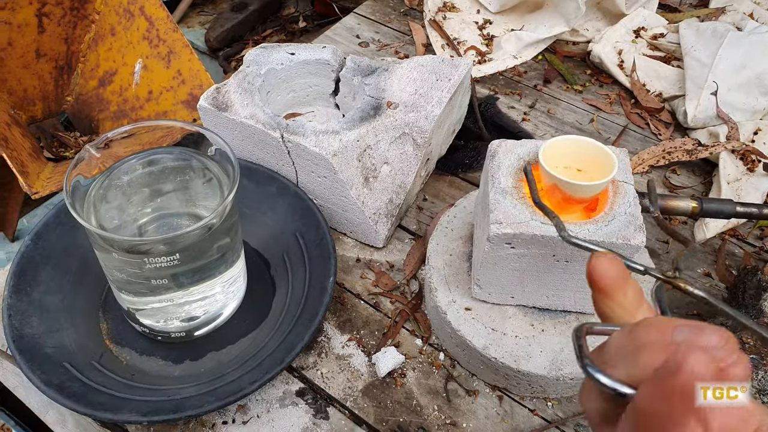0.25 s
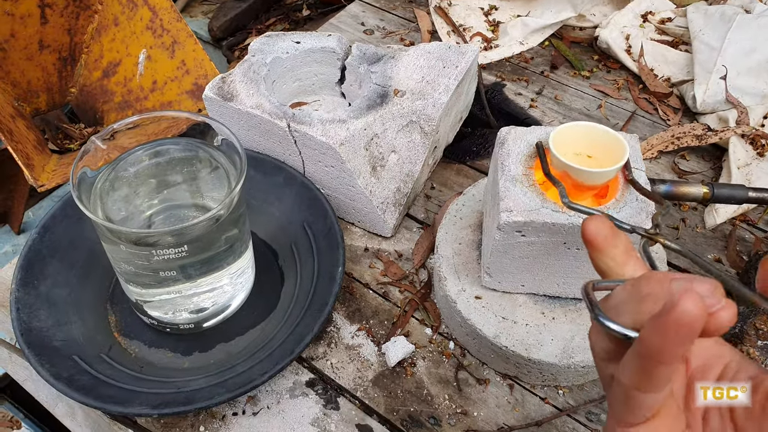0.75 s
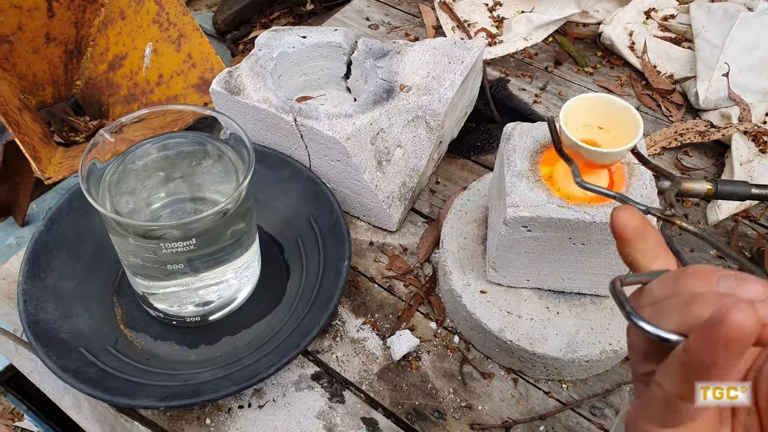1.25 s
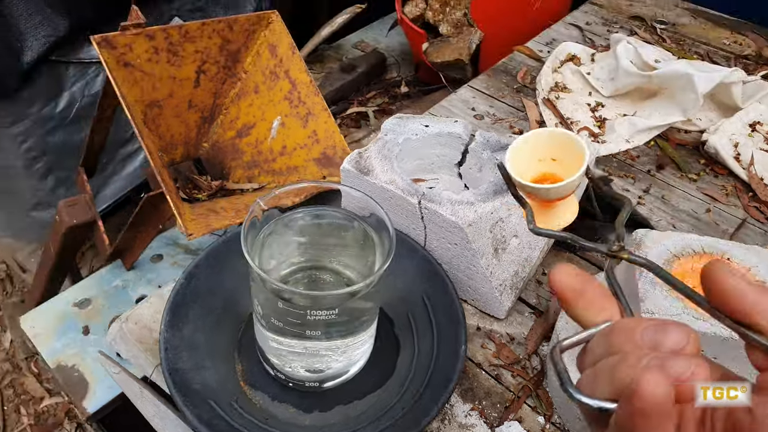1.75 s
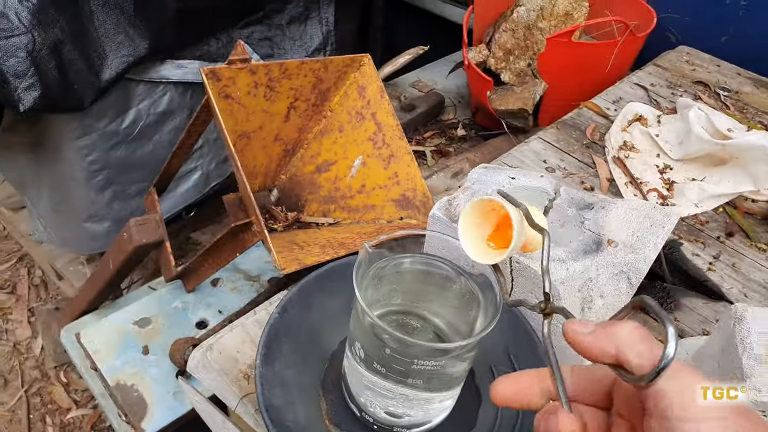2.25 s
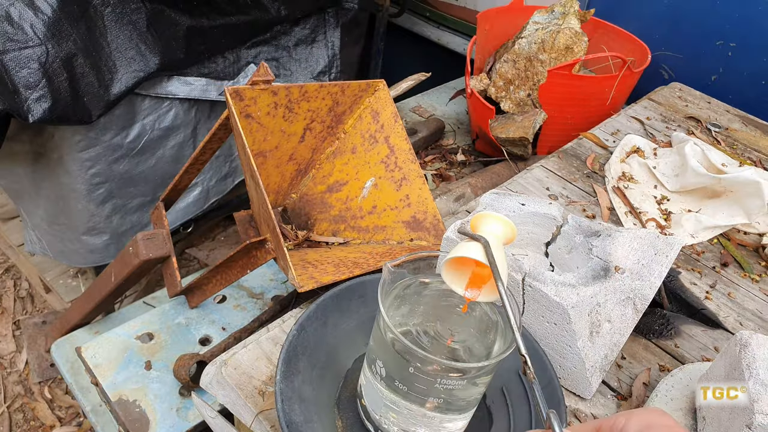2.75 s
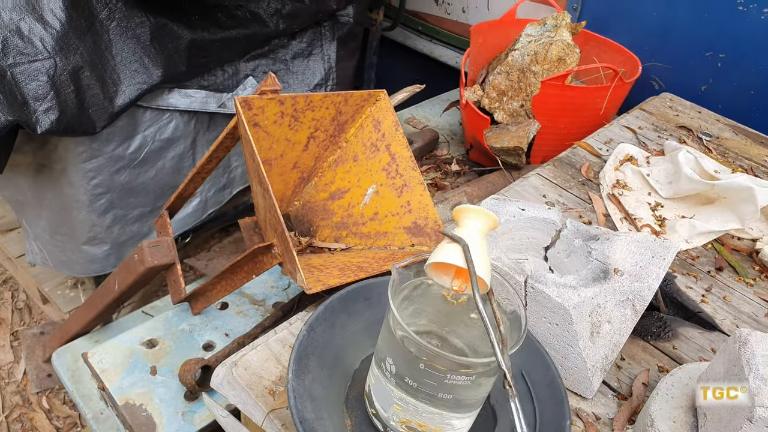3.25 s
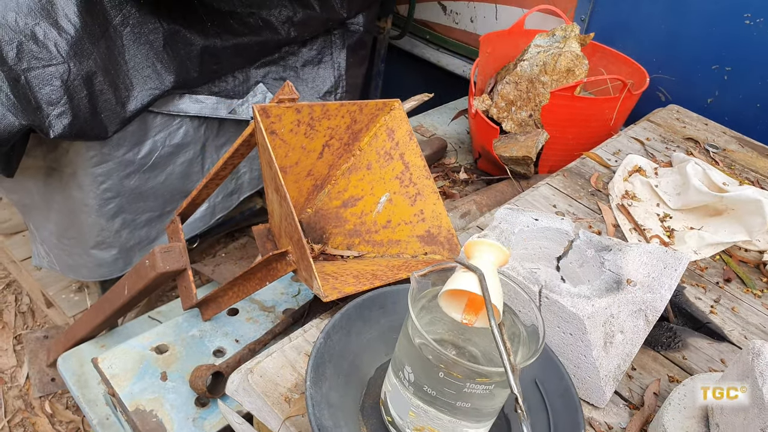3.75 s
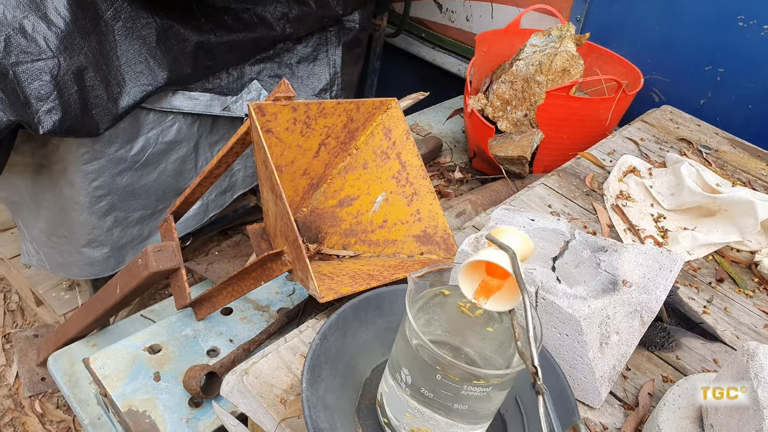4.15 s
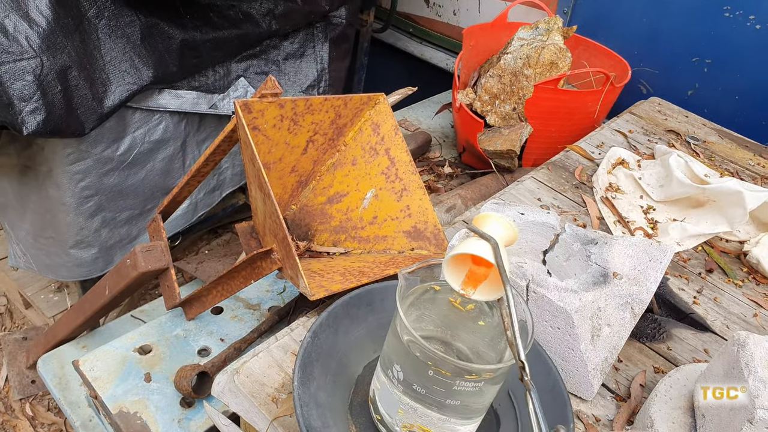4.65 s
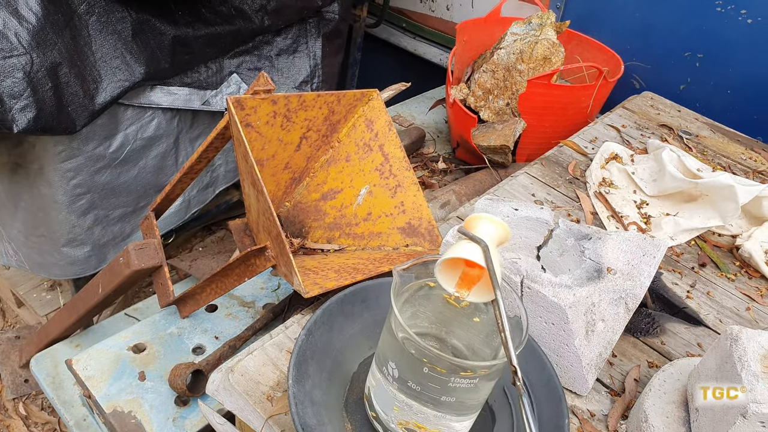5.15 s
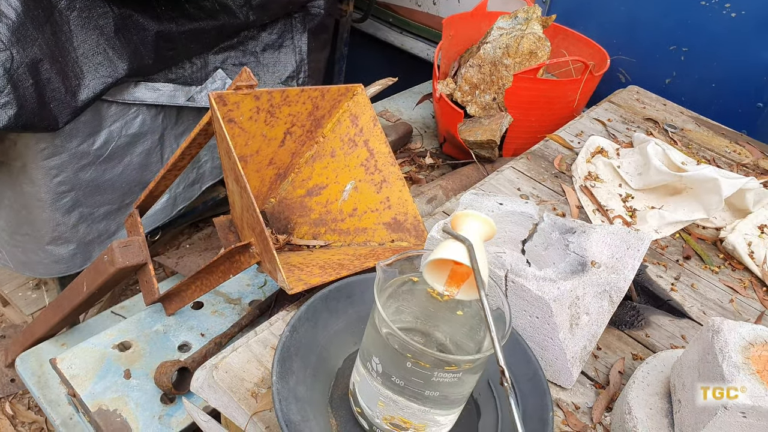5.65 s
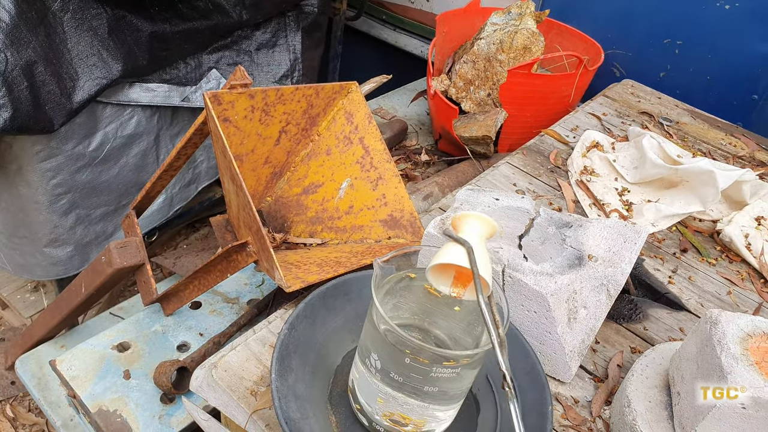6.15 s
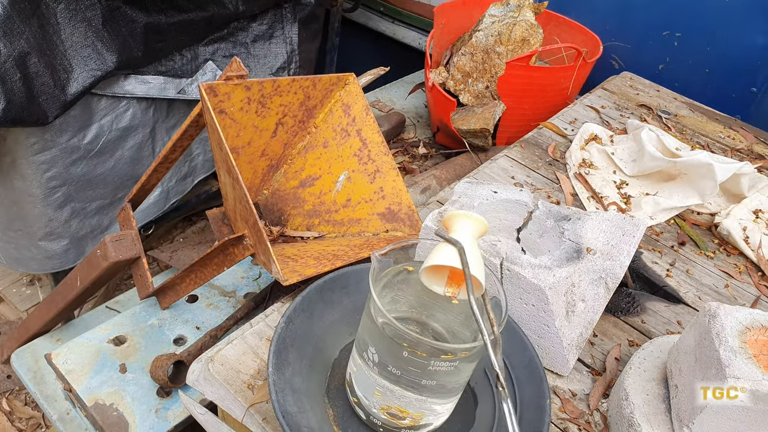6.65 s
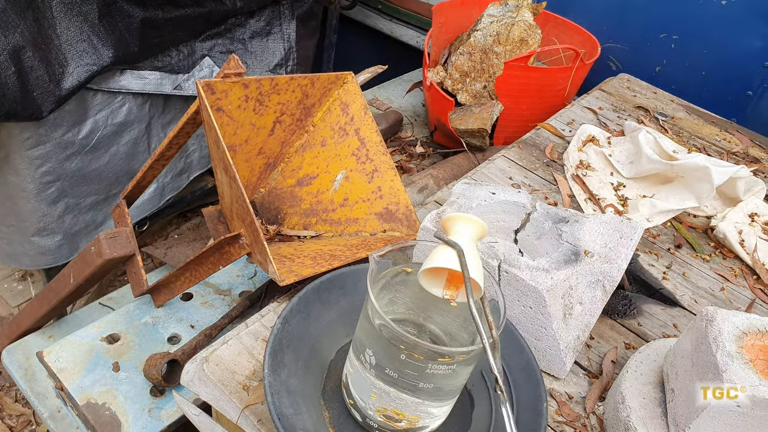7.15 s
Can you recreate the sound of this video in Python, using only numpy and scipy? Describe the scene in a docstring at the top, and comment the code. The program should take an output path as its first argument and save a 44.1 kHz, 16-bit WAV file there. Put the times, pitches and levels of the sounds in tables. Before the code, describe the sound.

Outdoors, close to a handheld stereo camera, a gas torch roars with a low throaty rumble, jet hiss and popping flame. Metal tongs tick faintly. Near three seconds molten metal drops into a glass of water: chirps, loud hard snaps, gurgling and sizzling for about half a second, fading within a second. The level dips afterwards; a bright glass clink follows, then the torch roars on with faint taps.

```python
"""A gas torch roars into a small stone furnace: turbulent noise, popping flame and a hissing jet; tongs tick.
A hand-held camera turns to a glass beaker of water, which recolours the torch at the two microphone ports.
Molten metal is poured in: gliding tones chirp, patchy noise gurgles, sizzles and hisses, the boiling shakes
the resonant glass, and decaying snaps with fizz are droplets cracking; the camera's gain control ducks after
the loudest peaks. Last, the tongs knock the beaker and ring its decaying modes while the torch roars on."""
import sys
import numpy as np
from scipy import signal
from scipy.fft import rfft, irfft, next_fast_len
from scipy.io import wavfile
from scipy.ndimage import uniform_filter1d, minimum_filter1d, map_coordinates

SR = 44100
rng = np.random.default_rng(int(sys.argv[2]) if len(sys.argv) > 2 else 0)


def persist_wave(psi):
    """Save psi, clipped to +-1, as 16-bit WAV."""
    counts = np.round(np.clip(psi, -1, 1) * 32767).astype(np.int16)
    wavfile.write(sys.argv[1], SR, np.atleast_2d(counts).T)


N = 326340
TOP_HZ = 16000  # band limit of the camera
FRAME = 1024  # samples in a frame of the port filter

# torch at the camera: (time [s], roar level [dB], jet over roar [dB], treble tilt from 4 kHz, full at 8 kHz [dB])
TORCH_LEVELS = [(0, -32, -2.5, -4.5), (.6, -30.5, -5, -3), (1.17, -31.5, -4.5, -5), (1.35, -31, -5, -4.5),
                (2.1, -32, -3.5, -5), (2.6, -34.5, -6.5, -5.5), (4.1, -34, -6.5, -.5), (5.25, -33.5, -7, 0),
                (5.85, -35.5, -7, 0), (6.3, -34, -8.5, -0.5), (6.75, -36, -6, 0), (6.95, -33, -8.5, -1),
                (7.4, -36, -6.5, -1)]
# camera turn: (time [s], turn [0 facing the furnace, 1 facing the beaker])
CAMERA_TURN = [(0, 0), (1.5, 0.17), (1.8, 0.49), (2.2, 0.93), (7.4, 0.93)]
# relative colours at the ports: (frequency [Hz], left level [dB], right level [dB], left lag [rad], likeness [0-1])
ROAR_FACING_COLOUR = [(22, -46, -50, 0.1, 0.87), (60.5, -9, -4.5, 0.045, 0.98), (129.2, -8.5, -9, 0.1, 1),
                      (241, 0.5, 1, 0, 0.97), (382, -13, -12, 0.016, 0.95), (590, -23, -28.5, 0.2, 0.76),
                      (689, -20, -6.5, 0, 1), (750, -16.5, -22, 0.51, 1), (931, -10.5, -6.5, 0, 0.89),
                      (970, -21, -17.5, 0.062, 1), (1200, -14, -19, 0, 0.88), (1337, -14, -28, 1.7, 0.87),
                      (1490, -21.5, -21.5, 1.5, 1), (1760, -19.5, -16.5, 1.6, 1)]
ROAR_TURNED_COLOUR = [(22, -44, -44.5, 0.1, 0.85), (59, -15.5, -10, 0.1, 0.97),
                      (129, -10, -9.5, 0.16, 0.99), (227.4, -2, 1, 0.273, 1),
                      (399, -10.5, -12.5, 0.36, 0.98), (619, -20, -23.5, 1.73, 0.71),
                      (683, -40, -17, 7, 0.78), (784, -19, -22.5, 0.7, 1), (886, -13.5, -7, 1.45, 0.8),
                      (960, -20.5, -22.5, 0.59, 0.83), (1210, -20.5, -20, 1.57, 0.82),
                      (1390, -14, -23.5, 2.5, 0.88), (1500, -18.5, -26, 4.2, 1),
                      (1820, -14.5, -22.5, 3.54, 1)]
JET_FACING_COLOUR = [(1720, -9, -31, 1.6, 0.87), (1910, -2.5, -9, 2.05, 0.66), (2133, 1, -6.5, 2.47, 0.85),
                     (2610, -23.5, -24.5, 3.2, 0.47), (3010, -16, -12.5, 3.95, 1),
                     (3340, -31, -25, 2.6, 0.43), (4065, -35, -25, 12, 0.21), (4450, -34, -17, 3.4, 0.25),
                     (4730, -22, -24, 12, 0.41), (5100, -19, -13, 9, 0.64), (5810, -12, -10.5, 7.3, 0.7),
                     (6100, -16.5, -29, 11.5, 0.64), (6730, -21, -17, 8.8, 0.66),
                     (7340, -28, -27.5, 9.3, 0.38), (7880, -15.5, -36, 14.3, 0.44),
                     (8600, -21.5, -27.5, 14.8, 0.73), (9260, -14.5, -18.5, 16.5, 1),
                     (10800, -29.5, -27, 19.5, 0.55), (12000, -36.5, -25.5, 27.4, 0.35),
                     (13500, -43, -29, 32.0, 0.34), (14600, -29.5, -22, 36.0, 0.43),
                     (15700, -30.5, -33.5, 38.5, 0.44)]
JET_TURNED_COLOUR = [(1690, -9, -8, 5.9, 1), (1980, -15, -5.5, 3.6, 0.95), (2217, 2, -8.5, 3.8, 0.73),
                     (2690, -30, -16.5, 5, 0.54), (3084, -11.5, -16.5, 7.86, 1),
                     (3200, -40.5, -18.5, 9.1, 0.21), (4020, -36, -20, 5.5, 0.26),
                     (4400, -23, -15, 10.4, 0.79), (4930, -36, -19, 10.4, 0.31),
                     (5450, -18, -19, 12.4, 0.44), (5710, -15.5, -11.5, 15.2, 0.44),
                     (5830, -15, -17, 15.8, 0.42), (6500, -11.5, -17.5, 18.8, 0.484),
                     (7480, -30, -27.5, 22.8, 0.49), (8170, -21.5, -37.5, 21.8, 0.66),
                     (8740, -27, -22.5, 25, 0.47), (9470, -18, -20, 25.7, 0.44),
                     (10830, -23.5, -32, 30.2, 0.48), (12000, -36, -26, 33.6, 0.4),
                     (13500, -51, -30.5, 37.5, 0.18), (14600, -32.5, -24, 40.0, 0.26),
                     (15700, -35.5, -37, 43.0, 0.26)]
BEAKER_COLOUR = [(600, -17.5, -12.5, -2, 0.87), (1060, -16, -16, 3, 0.65), (1585, 3.5, -9, -2.1, 0.94),
                 (2014, 2.5, -1, 3, 0.66), (2694, -2, -12.5, -2.5, 0.53), (3470, -10, -5.5, 2.5, 0.34),
                 (3900, -15.5, -15, -1, 0.36), (5060, 1.5, 5, 5, 0.36), (5500, 0.5, 0, 0, 0.26),
                 (6860, -7, -4, 5, 0.56), (7760, -16, -20, 2, 0.29), (8430, -16.5, -28, -3, 0.29),
                 (9090, -13.5, -8.5, 5.5, 0.38), (10580, -5, -17, 1, 0.27), (11600, -7, -9, 0.5, 0.2),
                 (12600, -13, -12, -4, 0.27), (13760, -9, -12, 1, 0.27), (15800, -8.5, -13, -12, 0.35)]
# narrow resonances and one hollow of furnace and nozzle: (frequency [Hz], width [Hz], lift [dB])
NOZZLE_RESONANCES = [(613, 43, -5.5), (902, 66, 3.5), (2197, 72, 5), (3060, 72, 5.5), (4440, 129, 3.5),
                     (5705, 73, 8.5), (9100, 300, 3)]
# pops of the flame at set times: (time [s], strength [dB])
FLAME_POPS = [(.104, 13.5), (.323, 10.5), (0.379, 15.5), (0.449, 9), (.481, 7), (.694, 1), (.750, 8),
              (.824, 13), (1.054, 12), (1.284, 17), (1.459, 18), (4.158, 1), (5.075, 6), (5.512, 7),
              (6.165, 7), (6.199, 16), (6.569, 11)]
# small metal contacts: (time [s], level [dB], lowest frequency [Hz], highest frequency [Hz], left over right [dB])
METAL_TICKS = [(.482, -26, 4500, 7200, -2.5), (.890, -24, 4500, 7000, 3), (.905, -28, 2000, 3500, 8),
               (.918, -29, 2000, 4500, -3), (.928, -25.5, 2200, 5000, -6), (0.943, -26.5, 3770, 9600, 7),
               (2.171, -16.5, 1200, 2390, 10), (2.288, -37, 1200, 3020, 3)]
# tongs against the beaker: (time [s], blow level [dB], share of the free ringing time [0-1])
BEAKER_KNOCKS = [(3.7298, 3.5, 0.85), (6.2215, -13.5, 0.16), (6.379, -15, 0.14), (6.47, -22, 0.14),
                 (6.998, -20, 0.22)]
# mode frequencies of the beaker [Hz]
GLASS_MODE_HZ = [1548, 2611, 2615, 2934, 3262, 3310, 4400, 4832, 4974, 5517, 6175, 11200, 13600]
# those modes, row by row: (struck left [dB], struck right [dB], free 60 dB decay [s], shaken by boiling [dB])
GLASS_MODES = [(-51, -48, 0.27, 0), (-9.5, -25, 0.1, 6), (-24.5, -37, 0.55, 15.5), (-35, -33, 0.36, 1),
               (-33, -38, 0.27, 10), (-41, -30, 0.33, 11.5), (-40, -40, 0.029, 2.5), (-37, -35, 0.21, 18),
               (-31, -46, 0.2, -8), (-35, -32, 0.061, 11), (-42, -37, 0.11, 7), (-28, -31, .03, -4),
               (-45, -45, 0.03, 4)]
# steam off the cooling metal: (time [s], sizzle level [dB], hiss level [dB])
STEAM_LEVELS = [(2.685, -45, -32), (2.71, -37, -32), (2.77, -35, -28.5), (2.83, -22, -24),
                (2.92, -24.5, -20.5), (2.95, -31, -23), (3.2, -32.5, -27), (3.25, -33.5, -39),
                (3.4, -39.5, -47), (3.46, -35.5, -40), (3.56, -33, -40), (3.61, -37.5, -51),
                (3.72, -52, -68)]
# brief spurts of steam: (time [s], sizzle level [dB], hiss level [dB])
STEAM_SPURTS = [(2.69, -40, -22.5), (2.702, -22, -32), (2.785, -30, -28), (2.805, -29, -31),
                (2.888, -31, -21), (3.012, -28, -34), (3.146, -29, -22), (3.215, -27, -27),
                (3.345, -28.5, -30)]
# bouts of bubbling: (time [s], length [s], gurgle level [dB], deep gurgle level [dB])
BUBBLING_BOUTS = [(2.718, .02, -34, -48), (2.75, 0.013, -29, -57), (2.78, .03, -33.5, -55),
                  (2.815, 0.041, -23.5, -36), (2.862, 0.04, -25.5, -46), (2.967, 0.024, -26.5, -36),
                  (3.017, 0.058, -24, -36.5), (3.146, 0.034, -28.5, -48), (3.182, 0.042, -28, -32),
                  (3.25, 0.047, -33, -34.5), (3.292, 0.067, -35, -37), (3.355, 0.028, -41, -35),
                  (3.44, .02, -43, -39), (3.53, .05, -39, -36.5), (3.583, 0.077, -42, -36.5)]
# steady bubbling beneath the bouts: (time [s], gurgle level [dB], deep gurgle level [dB])
SIMMER_LEVELS = [(2.685, -44, -52), (2.9, -30.5, -50), (3.12, -37, -49), (3.4, -36.5, -40),
                 (3.62, -32.5, -43), (3.72, -51, -58)]
# singing pockets of steam:
# (time [s], level [dB], start pitch [Hz], end pitch [Hz], length [s], left over right [dB])
STEAM_POCKETS = [(2.692, -23, 12400, 9500, 0.00596, 2), (2.6984, -16.5, 7060, 4800, 0.0087, -8),
                 (2.705, -19, 5820, 5060, 0.0069, -3), (2.709, -26, 2590, 2400, 0.014, 1.5),
                 (2.710, -22.5, 3724, 3380, 0.0071, -5), (2.736, -15.5, 1670, 2220, .016, 2),
                 (2.738, -23, 13500, 13580, .014, 4), (2.754, -20.5, 1990, 2050, 0.013, 0.5),
                 (2.775, -19, 1970, 2030, 0.0087, 2), (2.7775, -17.5, 7400, 4835, 0.013, -1),
                 (2.802, -13, 5960, 4730, 0.0062, -4), (2.810, -14, 5040, 4840, .004, -6),
                 (2.903, -23, 5490, 5500, 0.029, -6), (3.028, -21.5, 1286, 1440, 0.047, 4.5),
                 (3.287, -24, 1650, 1910, 0.028, 3), (3.262, -26, 1800, 1705, 0.018, 6),
                 (2.82, -19.5, 1584, 1460, .035, 8), (2.823, -33, 820, 775, .03, 2),
                 (3.165, -26, 2360, 2220, .03, 3), (3.17, -26, 1740, 1690, 0.052, 3),
                 (3.311, -26, 1815, 2170, .035, 4), (3.584, -28.5, 804, 910, 0.033, 0)]
# droplets bursting: (time [s], snap level [dB], left over right [dB], fizz over snap [dB])
DROPLET_CRACKS = [(2.8197, -1.5, 1.5, -9), (2.8352, -2.5, 2, -13), (2.8508, -2, 1, -10),
                  (2.8824, -2.5, 2, -12), (2.8905, -7, 2, -10), (2.9427, -5, 3.5, -12),
                  (3.0138, -2, 4, -12), (3.1467, -13, 2, -6), (3.306, -17, 0, -9), (3.350, -17, 1, -6)]
# mean ringing of a burst: (frequency [Hz], relative level [dB], 60 dB decay [s])
SNAP_MODES = [(1730, -2.5, 0.012), (2530, -2, 0.0085), (3460, -8.5, 0.0095), (4380, -6, 0.008),
              (5440, -4.5, 0.0092)]

# a fall is the time for the power to drop by a factor e
SPURT_S, SPURT_RISE_S, SPURT_FALL_S = 0.0065, 0.0037, 0.0046
BOUT_RISE_S, BOUT_FALL_S = 0.006, 0.0085
THRESHOLD_DB, DUCK_DB, ATTACK_S, HOLD_S, RECOVER_DB_PER_S = -2.5, 5, 0.02, 1.2, 6  # gain control


def amp(db):
    """Logarithmic level: decibels become an amplitude ratio."""
    return 10 ** (np.asarray(db) / 20)


def unit(x):
    """Root-mean-square normalisation: the mean power is brought to 1."""
    return x / np.sqrt(np.mean(np.abs(x) ** 2) + 1e-20)


def columns(rows, at):
    """Linear interpolation: each column after the first, read at the given places."""
    first, *cols = np.transpose(rows)
    return np.array([np.interp(at, first, c) for c in cols])


def wobble(rate):
    """Slow random modulation: a smooth curve through `rate` random knots a second."""
    knots = rng.standard_normal(int(N * rate / SR) + 4)
    return map_coordinates(knots, [np.arange(N) * rate / SR])


def patchy(depth_db, frame):
    """Intermittency: white noise with patches of random gain, briefer for a shorter frame [samples]."""
    spectrum = signal.stft(rng.standard_normal(N), nperseg=frame)[2]
    field = rng.standard_normal(spectrum.shape)
    field = uniform_filter1d(uniform_filter1d(field, 3, axis=0), 3, axis=1)
    return unit(signal.istft(spectrum * amp(depth_db * unit(field)), nperseg=frame)[1][:N])


def three_patchy(depth_db, frame):
    """Statistical independence: one noise for both ports to share, and one for each port alone."""
    return [patchy(depth_db, frame) for _ in range(3)]


def ports(noises, facing, turned, lo_hz, hi_hz, tilt_db=0, modes=()):
    """Partial coherence: each port hears coloured shared noise, lagged on the left, and noise of its own."""
    hz, t, z = signal.stft(noises, SR, nperseg=FRAME)
    turn = columns(CAMERA_TURN, t)[0]
    facing_part = columns(facing, hz)[..., None] * (1 - turn)
    turned_part = columns(turned, hz)[..., None] * turn
    left_db, right_db, lag, alike = facing_part + turned_part
    alike = np.clip(alike, 0, 1)
    band = 1 / np.sqrt((1 + (lo_hz / (hz + 1)) ** 24) * (1 + (hz / hi_hz) ** 24))
    lift_db = sum(db / (1 + (2 * (hz - centre) / width) ** 2) for centre, width, db in modes) + 0 * hz
    colour = amp([left_db, right_db] + lift_db[:, None]) * band[:, None]
    colour /= np.sqrt(np.mean(colour ** 2, axis=(0, 1)))  # mean power 1 over band and ports, before the tilt
    octaves = np.clip(np.log2(hz / 4000 + 1e-9), 0, 1)  # above 4 kHz, at most one
    colour *= amp(octaves[:, None] * np.interp(t * SR, np.arange(N), tilt_db + np.zeros(N)))
    shared = np.array([z[0] * np.exp(-1j * lag), z[0]])
    mixed = np.sqrt(alike) * shared + np.sqrt(1 - alike) * z[1:]
    return signal.istft(colour * mixed, SR, nperseg=FRAME)[1][:, :N]


def sides(db):
    """Level difference between ports: half the left-over-right decibels go to each, with opposite sign."""
    return amp([[db / 2], [-db / 2]])


def add(out, s, sound):
    """Superposition: a sound is summed in at time s."""
    start = round(s * SR)
    out[:, start:start + sound.shape[1]] += sound


def swells(starts, lengths, levels_db, rise, fall):
    """Power addition of independent events that rise, hold and die away exponentially."""
    t = np.arange(N) / SR - np.asarray(starts)[:, None]
    after_end = np.clip(t - np.asarray(lengths)[:, None], 0, None)
    shape = np.clip(t / rise, 0, 1) ** 2 * np.exp(-after_end / fall)
    return amp(levels_db) ** 2 @ shape


def burst(lo_hz, hi_hz, t60, alike=0.48):
    """Impulsive noise: a band-limited puff dies exponentially, partly shared by the ports, peak 1."""
    t = np.arange(1500) / SR
    noise = rng.standard_normal((3, len(t)))
    puff = alike * noise[0] + (1 - alike) * noise[1:]
    puff *= amp(-60 * t / t60) * (1 - np.exp(-t / 0.000094))
    band = signal.butter(3, [lo_hz, min(hi_hz, 18000)], "bandpass", fs=SR, output="sos")
    puff = signal.sosfilt(band, puff)
    return puff / np.abs(puff).max()


def flame_pops():
    """Combustion noise: pockets of gas catching fire give noise flashes of decaying power."""
    pops = (rng.random(N) < 60 / SR) * amp(2.5 + 6.7 * rng.random(N))  # 60 a second on average
    for s, db in FLAME_POPS:
        pops[round(s * SR)] = amp(db)
    power_decay = amp(-60 * np.arange(600) / SR / 0.0074)  # power falls a thousandfold in 7.4 ms
    flash = np.sqrt(np.abs(np.convolve(pops ** 2, power_decay)[:N]))
    middle = signal.butter(2, [550, 2600], "bandpass", fs=SR, output="sos")  # pops have little bass or treble
    return signal.sosfilt(middle, flash * rng.standard_normal((3, N)))


def torch():
    """Turbulence and resonance: burning roars in the furnace cavity; the nozzle's jet hisses, fluttering with it."""
    roar_db, jet_db, treble_db = columns(TORCH_LEVELS, np.arange(N) / SR)
    crackle = flame_pops()
    roar = ports(crackle + three_patchy(0.66, 512), ROAR_FACING_COLOUR, ROAR_TURNED_COLOUR,
                 15, 1785, modes=NOZZLE_RESONANCES)
    jet = ports(crackle + three_patchy(1.55, 256), JET_FACING_COLOUR, JET_TURNED_COLOUR,
                1894, 20000, treble_db, NOZZLE_RESONANCES)
    roar_gain = amp(roar_db + 0.47 * wobble(14))
    jet_gain = amp(jet_db + 0.46 * wobble(9.9))
    return roar_gain * (roar + jet_gain * jet)


def tongs():
    """Impact and modal decay: metal ticks are noise puffs; knocks ring the glass, damped by resting tongs."""
    out, t = np.zeros((2, N)), np.arange(SR // 3) / SR
    for s, db, lo_hz, hi_hz, pan_db in METAL_TICKS:
        add(out, s, amp(db) * sides(pan_db) * burst(lo_hz, hi_hz, 0.022))
    rise = 1 - np.exp(-t / 0.0029)
    for s, db, free in BEAKER_KNOCKS:
        for hz, (left_db, right_db, t60, _) in zip(GLASS_MODE_HZ, GLASS_MODES):
            level = amp(db + np.array([[left_db], [right_db]]) - 60 * t / (t60 * free))
            add(out, s, level * rise * np.sin(2 * np.pi * hz * t))
        click = amp(-31.5) * burst(630, 1400, 0.015)
        click += amp(-15) * burst(1700, 2840, 0.017)
        click += amp(-20) * burst(4300, 6000, 0.046)
        click += amp(-32) * burst(7000, 12200, 0.03)
        add(out, s, amp(db) * click)
    return out


def shaken_glass(boil):
    """Forced vibration: the boiling drives each mode of the glass wall as a damped resonator."""
    m = next_fast_len(N)
    f = np.fft.rfftfreq(m, 1 / SR)
    response = 0
    for centre, (_, _, t60, db) in zip(GLASS_MODE_HZ, GLASS_MODES):
        width = np.log(1000) / np.pi / t60  # half-power bandwidth [Hz]
        damping = 1j * f * width
        response = response + amp(db) * damping / (centre * centre - f * f + damping)
    return irfft(rfft(boil, m) * response, m)[:, :N]


def quench():
    """Boiling noise: brief noise patches round hot metal are bubbles and vapour films, sized by band."""
    t = np.arange(N) / SR
    fade_in = np.clip((t - STEAM_LEVELS[0][0]) / 0.012, 0, 1)
    fade_out = np.clip((STEAM_LEVELS[-1][0] - t) / 0.03, 0, 1)
    s, *spurt_db = np.transpose(STEAM_SPURTS)
    steam_power = amp(columns(STEAM_LEVELS, t)) ** 2
    steam_power += swells(s, SPURT_S + 0 * s, spurt_db, SPURT_RISE_S, SPURT_FALL_S)
    s, length, *bout_db = np.transpose(BUBBLING_BOUTS)
    bubble_power = amp(columns(SIMMER_LEVELS, t)) ** 2
    bubble_power += swells(s, length, bout_db, BOUT_RISE_S, BOUT_FALL_S)
    sizzle_gain, hiss_gain = np.sqrt(steam_power)
    gurgle_gain, deep_gain = np.sqrt(bubble_power)
    deep = ports(three_patchy(5.0, 1024), BEAKER_COLOUR, BEAKER_COLOUR, 674, 1270)
    gurgle = ports(three_patchy(3.7, 512), BEAKER_COLOUR, BEAKER_COLOUR, 1300, 4080)
    sizzle = ports(three_patchy(3.7, 256), BEAKER_COLOUR, BEAKER_COLOUR, 3300, 7800)
    hiss = ports(three_patchy(3.9, 256), BEAKER_COLOUR, BEAKER_COLOUR, 6860, 17500)
    boil = deep_gain * deep + gurgle_gain * gurgle + sizzle_gain * sizzle + hiss_gain * hiss
    boil *= fade_in * fade_out
    return boil + shaken_glass(boil)


def pockets():
    """Bubble resonance: a growing pocket falls in pitch, a rising bubble climbs; each swells and fades."""
    out = np.zeros((2, N))
    for s, db, start_hz, end_hz, length, pan_db in STEAM_POCKETS:
        u = np.arange(round(length * SR)) / (length * SR)  # share of the length gone by
        pitch_shake, level_shake = unit(uniform_filter1d(rng.standard_normal((2, len(u))), 50))
        hz = end_hz + (start_hz - end_hz) * (1 - u) ** 1.5
        hz *= 1 + 0.04 * pitch_shake
        tone = np.sin(2 * np.pi * np.cumsum(hz) / SR + [[0], [0.8]])  # right port leads by 0.8 rad
        swell = np.sin(np.pi * u ** 0.94) ** 0.82 * (1 + 0.3 * level_shake)
        add(out, s, amp(db) * sides(pan_db) * swell * tone)
    return out


def cracks():
    """Transient excitation: a bursting droplet snaps for a few decaying cycles, with a short fizz."""
    out, t = np.zeros((2, N)), np.arange(1500) / SR
    for s, db, pan_db, fizz_db in DROPLET_CRACKS:
        snap = 0
        for hz, level_db, t60 in SNAP_MODES:  # level, pitch and phase vary from burst to burst
            decay = amp(level_db + rng.normal(0, 2.7) - 60 * t / t60)
            angle = 2 * np.pi * hz * rng.normal(1, 0.0617) * t
            snap = snap + decay * np.sin(angle + rng.normal(0, 0.92, (2, 1)))
        snap = snap * (1 - np.exp(-t / 0.0013))
        fizz = amp(fizz_db) * burst(1600, 6000, 0.086, alike=0.49)
        add(out, s, amp(db) * sides(pan_db) * (snap / np.abs(snap).max() + fizz))
    return out


def scene():
    """Linear superposition of all sources at the two ports."""
    return torch() + quench() + pockets() + cracks() + tongs()


def behind(seconds):
    """Causality: settings for a sliding filter that looks only at the present and past."""
    size = round(seconds * SR)
    return dict(size=size, origin=(size - 1) // 2, mode="nearest")


def gain_control(x):
    """Peak-triggered gain: a peak over the threshold ducks it by a set step; it holds, then recovers steadily."""
    wanted_db = -DUCK_DB * (np.abs(x).max(axis=0) > amp(THRESHOLD_DB))
    held_db = minimum_filter1d(wanted_db.astype(float), **behind(HOLD_S))
    ramp_db = RECOVER_DB_PER_S * np.arange(N) / SR
    gain_db = ramp_db + np.minimum.accumulate(held_db - ramp_db)  # can rise no faster than the ramp
    return x * amp(uniform_filter1d(gain_db, **behind(ATTACK_S)))


def record(dry):
    """Linear filtering after gain control: the camera rolls off the deepest bass and stops at its band limit."""
    m = next_fast_len(N + 4096)
    hz = np.fft.rfftfreq(m, 1 / SR)
    response = (hz < TOP_HZ) / np.sqrt(1 + (48 / (hz + 1)) ** 6)
    return irfft(rfft(gain_control(dry), m) * response, m)[:, :N]


dry = scene()
out = record(dry)
persist_wave(out)
```